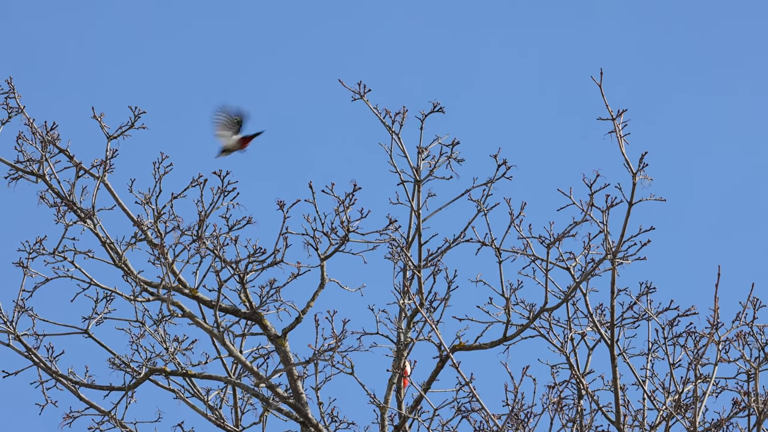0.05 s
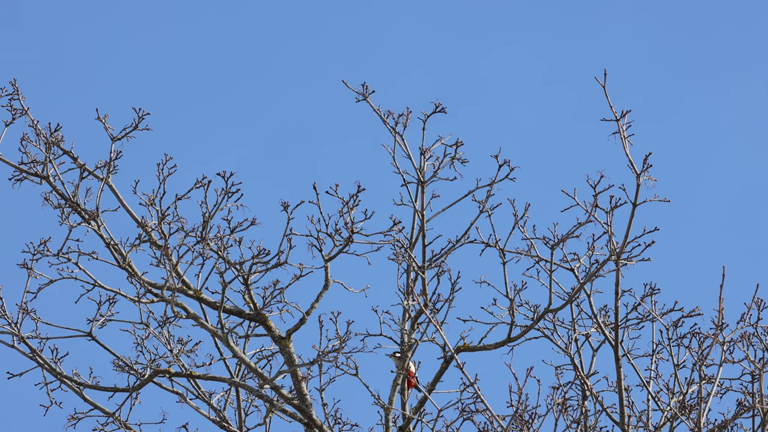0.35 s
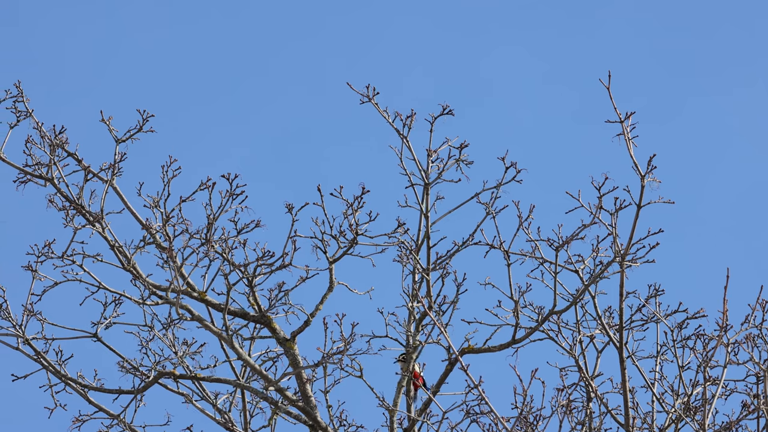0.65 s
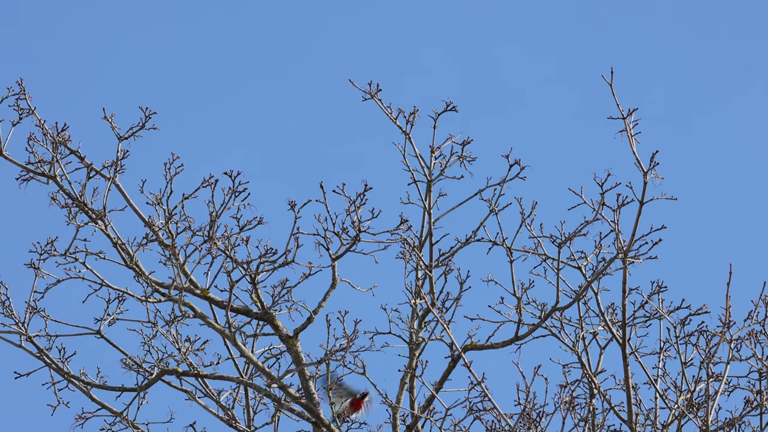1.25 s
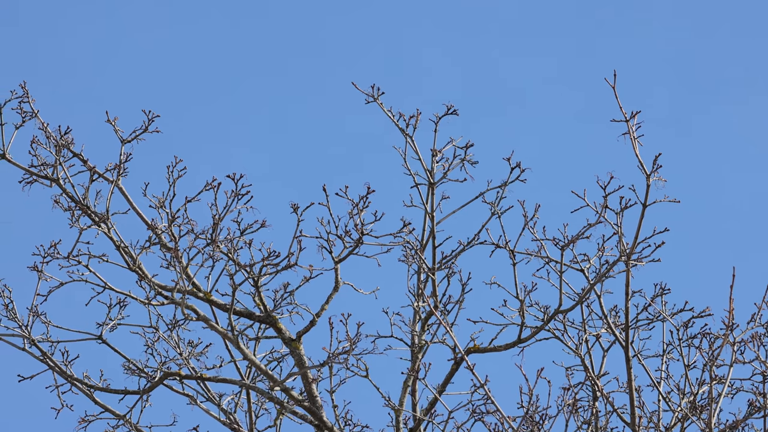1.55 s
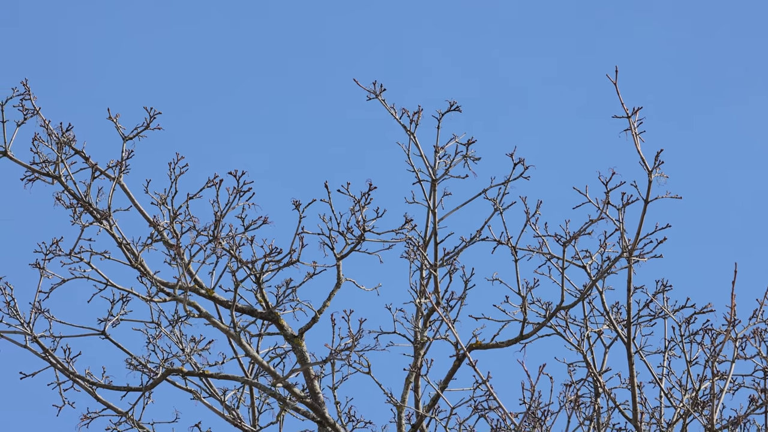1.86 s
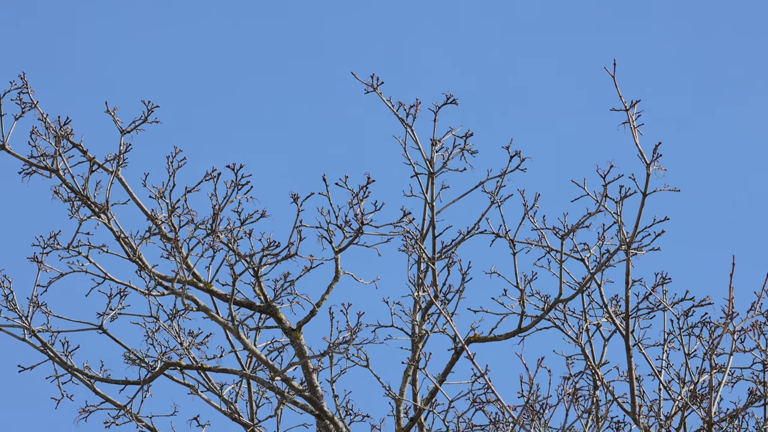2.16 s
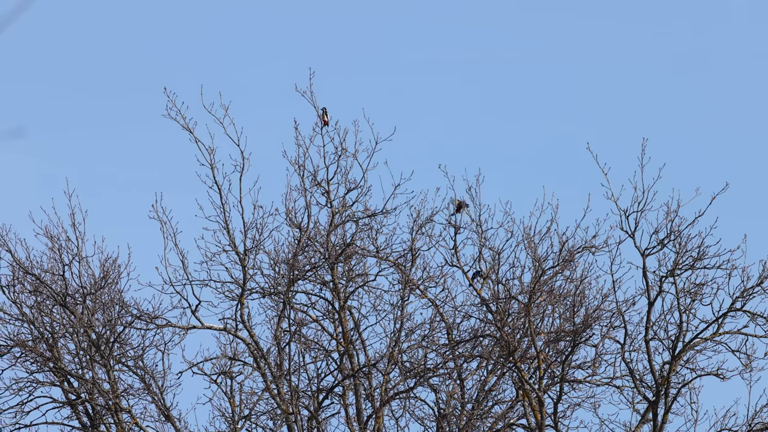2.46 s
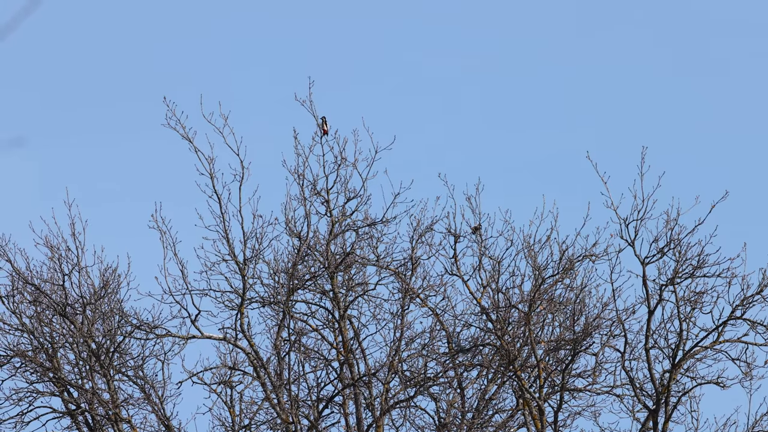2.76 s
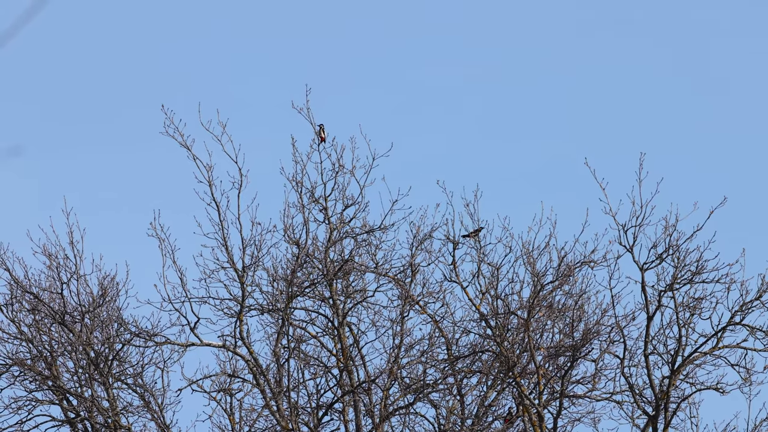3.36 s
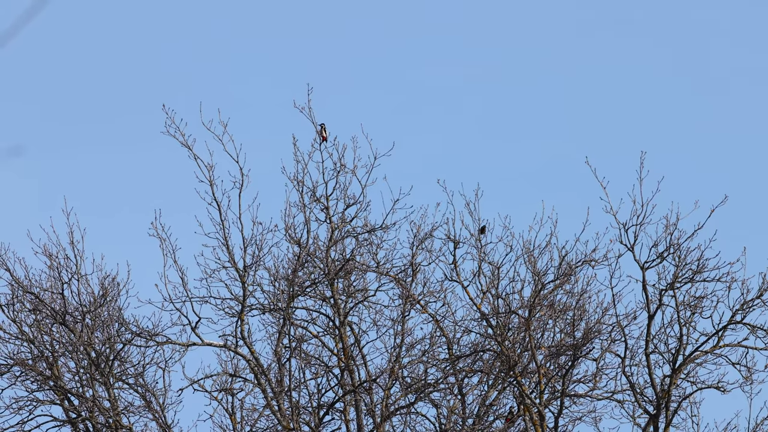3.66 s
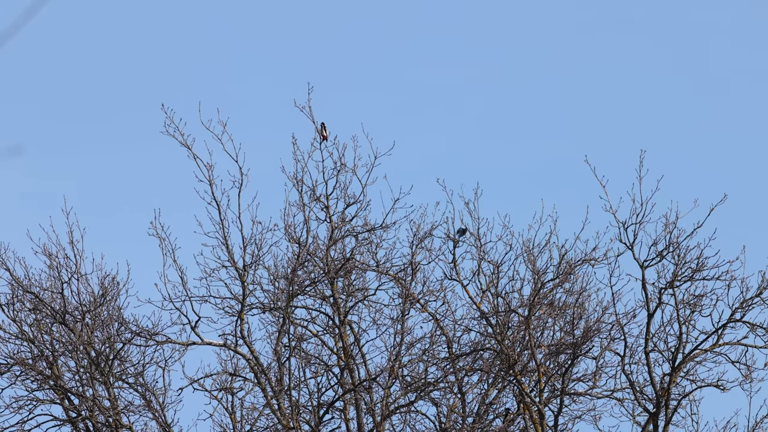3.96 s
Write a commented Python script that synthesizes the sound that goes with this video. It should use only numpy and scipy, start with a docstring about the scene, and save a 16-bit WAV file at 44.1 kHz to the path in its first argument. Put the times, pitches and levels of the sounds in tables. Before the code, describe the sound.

A woodpecker repeats sharp, harsh calls in the treetops, joined by a second bird's squeaks and some throaty squawks. The calling gives way to a short twitter and a faint far whistle, with a light breeze on the microphone throughout.

```python
"""Woodpeckers in bare treetops

Each harsh chatter note starts as a low buzz, leaps up in pitch and sags: harmonics shaped by a throat.
Hoarse squawks and a second bird's arched squeaks cut in, small birds whistle far off and twigs tick,
all scattered by the trees, while light wind buffets the microphone. The sound drops out for a moment,
then resumes with a quick twitter and fainter calls."""
import sys
import numpy as np
from scipy import signal
from scipy.fft import rfft, irfft, next_fast_len
from scipy.io import wavfile
from scipy.ndimage import map_coordinates

SR = 44100
rng = np.random.default_rng(int(sys.argv[2]) if len(sys.argv) > 2 else 0)


def waveform_to_disk(signal):
    """Save audio, clipped to [-1, 1], as 16-bit WAV at the path in sys.argv[1]."""
    frames = np.transpose(np.atleast_2d(signal))
    scaled = np.clip(frames, -1, 1) * 32767
    samples = np.round(scaled).astype(np.int16)
    wavfile.write(sys.argv[1], SR, samples)


N = 176400


def amp(db):
    return 10 ** (np.asarray(db) / 20)


def unit(x):
    return x / np.sqrt(np.mean(x ** 2) + 1e-20)


def clock():
    return np.arange(N) / SR


def along(points, hz):
    """Interpolation of (Hz, value) points on a logarithmic frequency axis."""
    freqs, values = np.transpose(points)
    return np.interp(np.log(hz + 1), np.log(freqs + 1), values)


def curves(rows):
    """Linear interpolation in time of each column after the first."""
    times, *columns = np.transpose(rows)
    return [np.interp(clock(), times, column) for column in columns]


def wobble(rate, size=N):
    """Smooth random modulation with `rate` knots a second."""
    return map_coordinates(rng.standard_normal(size // 8 + 4), [np.arange(size) * rate / SR], mode="mirror")


def filtered(x, response):
    """Linear filtering: the spectrum times a frequency response."""
    padded = next_fast_len(len(x) + 8192)
    return irfft(rfft(x, padded) * response(np.fft.rfftfreq(padded, 1 / SR)), padded)[:len(x)]


def noise(spectrum, size=N):
    """Coloured noise of rms 1."""
    return unit(filtered(rng.standard_normal(size), lambda hz: amp(along(spectrum, hz))))


def phase_of(hz):
    """Phase is the integral of frequency."""
    return 2 * np.pi * np.cumsum(hz) / SR


def add(out, s, x):
    """Superposition: mix x in, centred on time s."""
    i = round(s * SR) - len(x) // 2 + np.arange(len(x))
    inside = (i >= 0) & (i < N)
    out[i[inside]] += x[inside]


def gate(u):
    """A rounded window, open for u from -1 to 1."""
    return np.exp(-np.minimum(np.abs(u), 3) ** 6)


def bursts(rows):
    """Noise excites one resonance; duration and bandwidth are Gaussian standard deviations."""
    out, t = np.zeros(N), np.arange(-SR // 10, SR // 10) / SR
    for s, hz, octaves, length, db in rows:
        grain = rng.standard_normal(len(t)) * np.exp(-.5 * (t / length) ** 2)
        ring = filtered(grain, lambda f: np.exp(-.5 * (np.log2((f + 1) / hz) / octaves) ** 2))
        add(out, s, amp(db) * unit(ring) * np.sqrt(2 * length * SR / len(t)))
    return out


# Spectra of the air and the crowns. Each row: frequency in Hz, relative density in dB.
AIR_SPECTRUM = [(50, -3.5), (110, -6.5), (200, -4.5), (300, -10.5), (480, -11), (750, -17), (1100, -22.5),
                (1800, -32), (3000, -43.5), (5000, -33.5), (9000, -36), (15500, -37.5)]
RUSTLE_SPECTRUM = [(300, -50), (700, -7), (1500, 1), (2200, -1.5), (3600, -0.5), (6000, -11), (12000, -14)]
# The rustle's envelope. Each row: time in seconds, level in dB.
RUSTLE_LEVEL = [(0, -58.5), (1.4, -59), (1.7, -60.5), (2.25, -58.5), (2.6, -56.5), (3.1, -60.5), (4, -61)]

def breeze():
    """Broadband flow noise: steady air and a faint rustle in the crowns."""
    rustle_db, = curves(RUSTLE_LEVEL)
    air = noise(AIR_SPECTRUM) * amp(-47 + 0.42 * wobble(13))
    rustle = noise(RUSTLE_SPECTRUM) * amp(rustle_db + 0.79 * wobble(34.93))
    return air + rustle


# The rumble's spectrum. Each row: frequency in Hz, relative density in dB.
RUMBLE_SPECTRUM = [(10, -9.5), (20, 4), (46, -2), (65, -6.5), (100, -18), (150, -26), (300, -35.5),
                   (700, -54), (3000, -120)]
# Its envelope. Each row: time in seconds, relative level in dB.
RUMBLE_LEVEL = [(0, -35), (.3, -35), (.48, -31), (.62, -39.5), (1, -34), (1.55, -33.5), (1.8, -33),
                (1.92, -29), (2.2, -31), (2.35, -37.5), (2.68, -41), (2.92, -33), (3.25, -36.5),
                (3.58, -40), (3.72, -27.5), (3.88, -37.5), (4, -43)]
# Puffs. Each row: time in seconds, centre in Hz, bandwidth in octaves, duration in seconds, level in dB.
WIND_PUFFS = [(.04, 42, 0.74, 0.0056, -23.5), (1.32, 46.7, 0.7, 0.01, -28.5),
              (1.555, 32.4, 0.44, 0.017, -26), (1.9, 41, 0.59, 0.013, -23.5),
              (1.975, 40.5, 0.4, 0.015, -23), (2.13, 47.3, 0.53, 0.0069, -29),
              (3.69, 41.5, 0.62, 0.015, -23), (3.74, 84, 0.54, 0.033, -34)]

def buffeting():
    """Turbulent pressure on the microphone gives a lumpy rumble and single puffs."""
    db, = curves(RUMBLE_LEVEL)
    rumble = unit(noise(RUMBLE_SPECTRUM) * amp(0.52 * wobble(33)))
    return amp(db - 1) * rumble + bursts(WIND_PUFFS)


# The reverberation's spectrum. Each row: frequency in Hz, relative density in dB.
TAIL_SPECTRUM = [(300, -4), (1500, -5), (3000, 1), (4000, 2), (4800, 1), (5700, 0), (9000, -3.5)]

def among_trees(x, t60_s=0.38, tail_db=-11.5):
    """Scattering from trunks and branches adds a diffuse, exponentially decaying tail."""
    t = clock()[:SR]
    build_up = 1 - np.exp(-t / 0.0045)
    tail = noise(TAIL_SPECTRUM, size=SR) * amp(-60 * t / t60_s) * build_up
    return x + amp(tail_db) * signal.fftconvolve(x, tail / np.linalg.norm(tail))[:N]


# Ticks. Each row: time in seconds, centre in Hz, bandwidth in octaves, duration in seconds, level in dB.
TWIG_TICKS = [(.155, 506, 0.41, 0.003, -40.5), (.297, 475, 0.41, 0.0025, -42),
              (.869, 2180, 0.12, 0.00077, -37), (.98, 255, 0.34, 0.004, -38),
              (1.138, 780, 0.73, 0.0096, -44), (1.205, 514, 0.36, 0.0034, -45),
              (1.3205, 9000, 1.3, .001, -49.5), (1.467, 2000, 0.64, 0.0017, -47.5),
              (1.975, 1590, 0.6, 0.00093, -36.5), (2.163, 1980, 0.67, 0.001, -42.5)]

def twigs():
    """Brief excitation of a damped resonance: twig ticks and soft pats."""
    return bursts(TWIG_TICKS)


# Calls. Each row: time in seconds, centre in Hz, bandwidth in octaves, duration in seconds, level in dB.
BLURRED_CALLS = [(2.53, 1470, 0.05, 0.04, -60), (2.535, 3730, 0.14, 0.0018, -51),
                 (2.56, 1700, 0.95, 0.022, -56), (2.3, 2600, 0.55, 0.0035, -54),
                 (2.8, 1200, 0.32, 0.17, -68)]

def far_calls():
    """Band-limited noise stands for faint, blurred calls far away."""
    return bursts(BLURRED_CALLS)


# One drawn-out note. Each row: time in seconds, pitch in Hz, relative level in dB.
WHISTLE_CONTOUR = [(2.42, 5200, -62), (2.48, 5030, -63.5), (2.75, 4970, -63.5), (3.291, 4810, -64.5),
                   (3.36, 4570, -68), (3.55, 4600, -78)]

def long_whistle(blur_hz=170.4, waver_hz=59.5):
    """Spectral broadening: the trees blur a far bird's slowly sinking note."""
    hz, db = curves(WHISTLE_CONTOUR)
    sounding = (clock() > WHISTLE_CONTOUR[0][0]) & (clock() < WHISTLE_CONTOUR[-1][0])
    blur = wobble(2 * blur_hz) + 1j * wobble(2 * blur_hz)
    envelope = amp(db - 1.5 + 0.91 * wobble(18)) * sounding
    carrier = np.exp(1j * phase_of(hz + waver_hz * wobble(40)))
    return envelope * unit(np.real(blur * carrier))


# Thin distant whistles, and chirps that mostly form one twitter.
# Each row: start in seconds, duration in seconds, first pitch in Hz, last pitch in Hz, level in dB.
THIN_WHISTLES = [(.1, 0.14, 7470, 7950, -67), (2.32, .21, 7600, 8780, -60)]
TWITTER = [(1.765, 0.056, 3520, 4250, -60), (2.371, 0.018, 4680, 6200, -49),
           (2.384, 0.018, 3300, 6930, -48.5), (2.403, 0.015, 4470, 6600, -48),
           (2.417, 0.015, 4200, 6800, -53), (2.396, 0.045, 7000, 7150, -57.5),
           (2.86, .11, 1800, 1466, -62.5)]

def small_birds(rows, undertone_db, jitter, undertone_ratio=.67):
    """Frequency modulation: each note glides and levels off, with a weaker second voice below."""
    out, t = np.zeros(N), np.arange(-SR // 5, SR // 5) / SR
    for s, length, start_hz, end_hz, db in rows:
        u = 2 * t / length
        remaining = np.clip((1 - u) / 2, 0, 1)
        pitch = end_hz + (start_hz - end_hz) * remaining ** 2
        phase = phase_of(pitch * (1 + jitter * wobble(700, len(t))))
        tone = np.sin(phase) + amp(undertone_db) * np.sin(undertone_ratio * phase)
        add(out, s + length / 2, amp(db + 2.8 * wobble(104.8, len(t))) * gate(u) * tone)
    return out


def treble_loss(hz, cutoff_hz):
    """Directivity: treble is lost when the bird faces away."""
    return 1 / np.sqrt(1 + (hz / cutoff_hz) ** 9)


FLUTTER_RATE = 1000  # knots a second
# Squeaks. Each row: time of the top in seconds, duration in seconds, top pitch in Hz,
# fundamental in dB, octave in dB before treble loss, cutoff in Hz.
ARCHED_SQUEAKS = [(0.278, 0.031, 2590, -53.5, -44.5, 7000), (1.327, 0.037, 2660, -46.5, -41.5, 3670),
                  (1.943, 0.038, 2602, -44.5, -34, 3020), (2.596, .022, 2490, -66, -54, 5500)]

def squeaks(arch_drop=.36, roughness=0.4):
    """Amplitude modulation roughens the second bird's arch of pitch and its octave."""
    out, t = np.zeros(N), np.arange(-SR // 20, SR // 20) / SR
    for s, length, hz, fundamental_db, octave_db, cutoff_hz in ARCHED_SQUEAKS:
        u = np.clip(2 * t / length, -1.5, 1.5)
        pitch = hz * (1 - arch_drop * np.abs(u) ** 2.3) * (1 + 0.0041 * wobble(805, len(t)))
        phase = phase_of(pitch)
        octave = amp(octave_db) * treble_loss(2 * np.abs(pitch), cutoff_hz) * np.sin(2 * phase)
        tone = amp(fundamental_db) * np.sin(phase) + octave
        flutter = 1 + roughness * wobble(FLUTTER_RATE, len(t))
        add(out, s, gate(u) * tone * flutter)
    return out


# The throat's resonances. Each row: frequency in Hz, gain in dB.
THROAT_RESPONSE = [(800, -9.5), (1600, -9.5), (2300, -4.5), (3100, -6), (3800, -8), (4750, 0.5),
                   (5700, -4.5), (6500, -11.5), (8000, -12), (11000, -19), (15000, -22)]
# The source ahead of the throat. Each entry: relative level in dB, for harmonics 1 to 10.
HARMONICS_DB = [0, 1.5, -1, -1, -9, -2, 0, 0, 1, 6]

def voice(pitch, cutoff_hz, roughness, body_db=0, rasp_db=-21):
    """Source and filter: fluttering harmonics and pitch-pulsed breath pass through a fixed throat."""
    size, phase = len(pitch), phase_of(pitch)
    breath = filtered(noise(THROAT_RESPONSE, size), lambda hz: treble_loss(hz, np.median(cutoff_hz)))
    out = amp(rasp_db) * breath * (1 + np.cos(phase))
    for k, db in enumerate(HARMONICS_DB, 1):
        flutter = 1 + roughness * (wobble(FLUTTER_RATE, size) + 1j * wobble(FLUTTER_RATE, size))
        gain = amp(db + body_db * (k <= 2) + along(THROAT_RESPONSE, k * pitch))
        out += gain * treble_loss(k * pitch, cutoff_hz) * np.real(flutter * np.exp(1j * k * phase))
    return out


# Squawks. Each row: time of the top, swell and fade in seconds, top pitch in Hz,
# relative level in dB, cutoff in Hz, roughness from 0 to 1.
HOARSE_SQUAWKS = [(1.437, 0.035, 0.024, 1056, -55.5, 4500, .5), (1.894, 0.019, .012, 870, -50.5, 3800, 0.6),
                  (2.066, 0.045, 0.028, 1035, -49, 3740, 0.36),
                  (2.238, 0.06, 0.019, 1083, -49.5, 3930, 0.52), (2.554, 0.021, 0.052, 762, -56, 3800, 0.8)]

def squawks(climb_per_s=7.5, sag=.27, jitter=.05):
    """Joint pitch and amplitude modulation: throaty notes climb as they swell and droop as they fade."""
    out, t = np.zeros(N), np.arange(-SR // 10, SR // 10) / SR
    for s, swell_s, fade_s, hz, db, cutoff_hz, roughness in HOARSE_SQUAWKS:
        climb = climb_per_s * np.minimum(t, 0)
        droop = sag * np.clip(t / fade_s, 0, 2) ** 2
        pitch = hz * np.exp(climb - droop + jitter * wobble(220.3, len(t)))
        envelope = amp(db) * np.exp(-(t / np.where(t < 0, swell_s, fade_s)) ** 2)
        add(out, s, envelope * voice(pitch, cutoff_hz, roughness, body_db=2.5))
    return out


BUZZ_DB, BUZZ_DB_PER_S, BUZZ_CLIMB_PER_S, BUZZ_BRIGHTENING = -3, 290, 0.97, 0.13
LEAP_LEAD_S, LEAP_S = .0035, .0014
SNAP_LEAD_S, SNAP_S, SNAP_DB, SNAP_BRIGHTENING = 0.002, 0.0029, 1, 1.3
# Woodpecker notes. Each row: time of the crest in seconds, crest and buzz pitches in Hz,
# buzz and fall durations in seconds, relative level in dB, cutoff in Hz, roughness from 0 to 1.
CHATTER_NOTES = [(0.0975, 1598, 961, 0.024, 0.026, -39, 5000, 0.07),
                 (0.237, 1513, 929, 0.028, 0.02, -41, 5000, 0),
                 (0.3832, 1554, 940, 0.023, .019, -39, 5600, 0.2),
                 (0.5248, 1628, 952, 0.025, 0.021, -37, 6100, .12),
                 (0.6617, 1577, 946, 0.025, 0.022, -40, 4400, 0),
                 (0.8082, 1465, 863, .027, 0.026, -42, 4000, 0.28),
                 (0.967, 1480, 856, 0.024, 0.026, -44, 4130, 0),
                 (1.1283, 1590, 900, 0.03, 0.028, -41, 4900, 0.25),
                 (1.2717, 1650, 904, 0.0324, .024, -38.5, 4270, 0.17),
                 (1.401, 1416, 869, 0.033, 0.029, -43.5, 3900, .3),
                 (1.915, 1607, 924, 0.0208, .024, -43, 4160, 0.37),
                 (2.0557, 1613, 901, 0.017, 0.021, -42.5, 3700, 0.5)]

def chatter(sag=.35, fade_db=4.5, release_s=.0035, jitter=.009, shimmer_db=1.6):
    """A jump in fundamental frequency: each note swells as a buzz, leaps to its crest and sags."""
    out, t = np.zeros(N), np.arange(-SR // 14, SR // 14) / SR
    for s, crest_hz, buzz_hz, buzz_s, fall_s, db, cutoff_hz, roughness in CHATTER_NOTES:
        leap = .5 + .5 * np.tanh((t + LEAP_LEAD_S) / (2 * LEAP_S))
        snap = np.exp(-((t + SNAP_LEAD_S) / SNAP_S) ** 2)  # a loud instant in the leap
        fall = np.clip(t / fall_s, 0, 1.2)

        buzz_pitch = buzz_hz * (1 + BUZZ_CLIMB_PER_S * (np.minimum(t, 0) + buzz_s / 2))
        pitch = (buzz_pitch + (crest_hz - buzz_pitch) * leap) * (1 - sag * fall ** 2.573)
        pitch *= 1 + jitter * wobble(578, len(t))

        swell_db = (1 - leap) * (BUZZ_DB + BUZZ_DB_PER_S * np.minimum(t + LEAP_LEAD_S, 0))
        level_db = db + swell_db + SNAP_DB * snap - fade_db * fall + shimmer_db * wobble(396, len(t))
        onset = gate(np.minimum(t, 0) / buzz_s)
        release = .5 - .5 * np.tanh((t - fall_s) / release_s)

        strength = amp(db + 30)  # strong notes snap brighter
        brightness = 1 + BUZZ_BRIGHTENING * (1 - leap) + SNAP_BRIGHTENING * strength * snap
        add(out, s, amp(level_db) * onset * release * voice(pitch, cutoff_hz * brightness, roughness))
    return out


def scene():
    """Superposition of reverberant birds and twigs with dry wind, in one channel."""
    birds = chatter() + squawks() + squeaks() + long_whistle() + far_calls()
    birds += small_birds(TWITTER, undertone_db=-9, jitter=0.036)
    birds += small_birds(THIN_WHISTLES, undertone_db=-38, jitter=0.0064)
    return (among_trees(birds + twigs()) + buffeting() + breeze())[None]


def record(dry):
    """Gating and band limiting: the sound drops out briefly and loses its highest treble."""
    dropout_start_s, dropout_end_s, top_hz = 2.288, 2.325, 15780
    live = (clock() < dropout_start_s) | (clock() > dropout_end_s)
    return filtered(dry[0] * live, lambda hz: hz < top_hz)[None]


dry = scene()
out = record(dry)
waveform_to_disk(out)
```